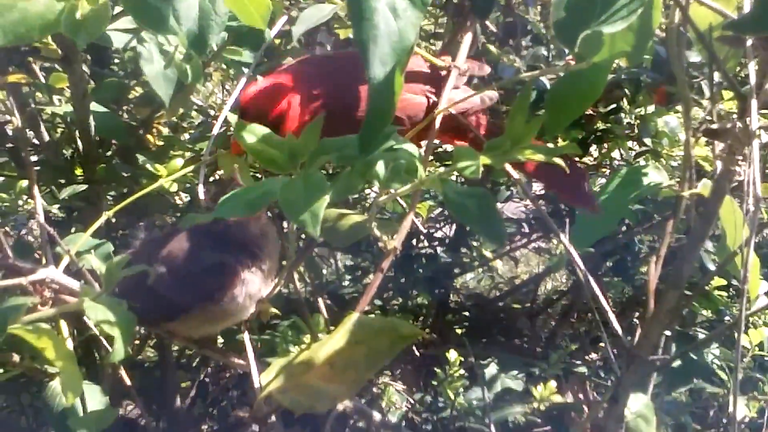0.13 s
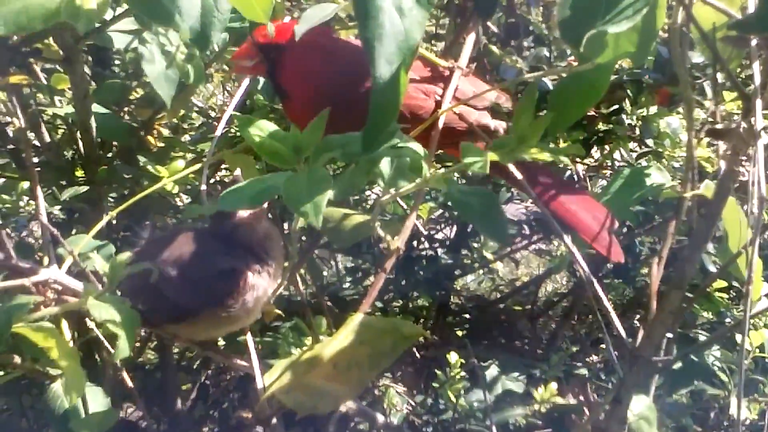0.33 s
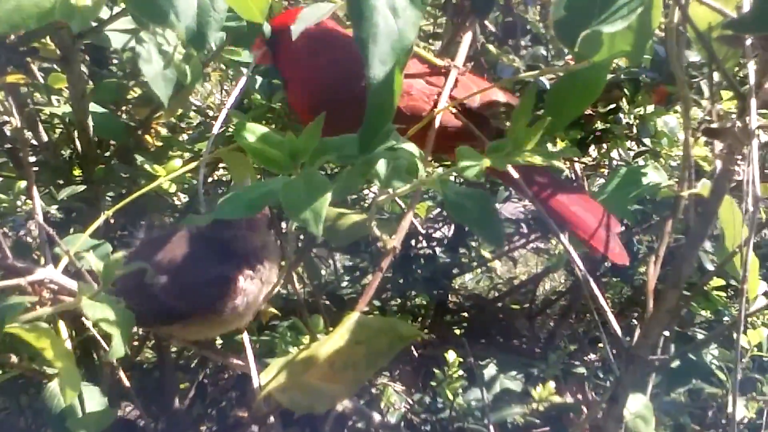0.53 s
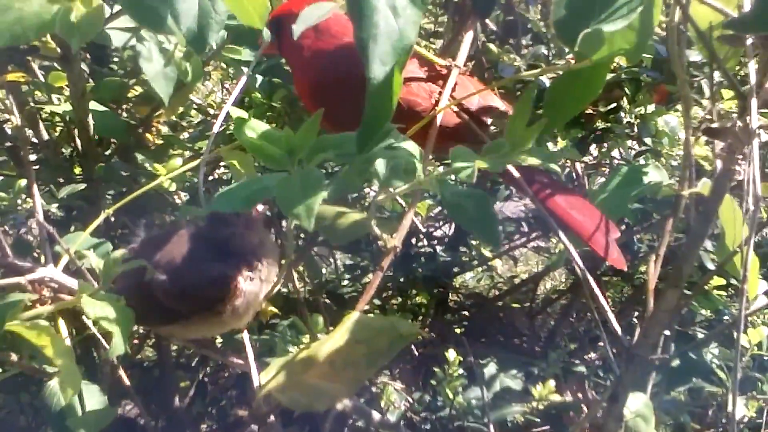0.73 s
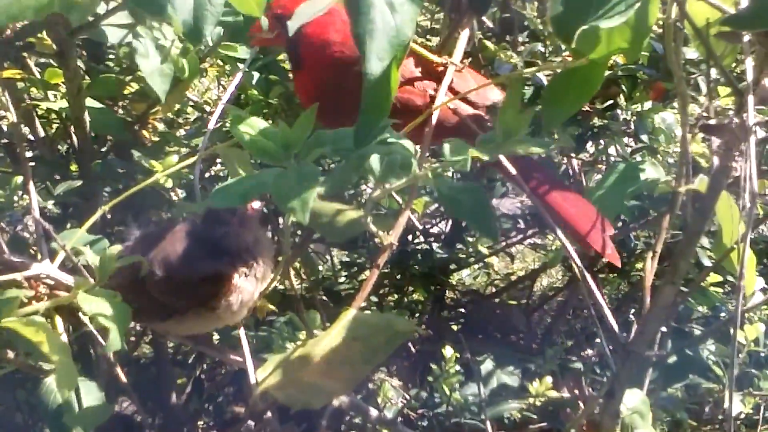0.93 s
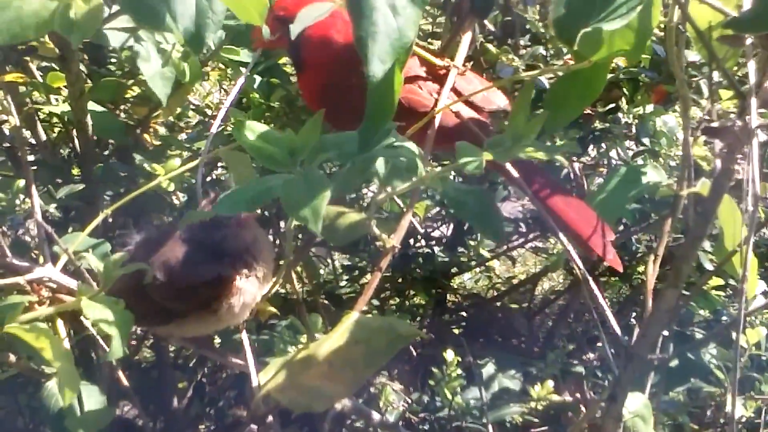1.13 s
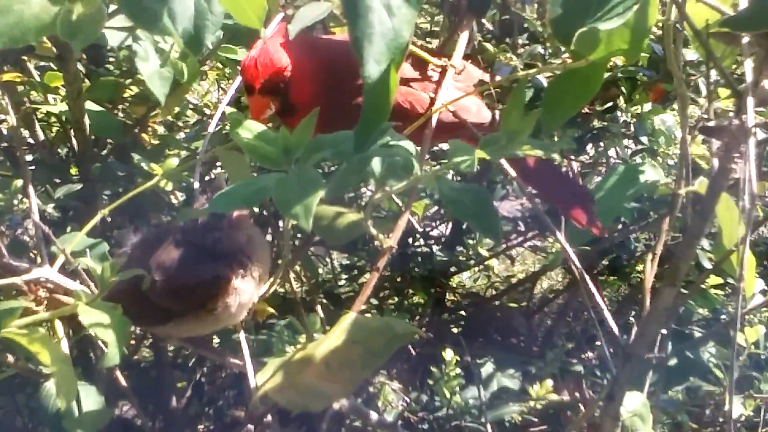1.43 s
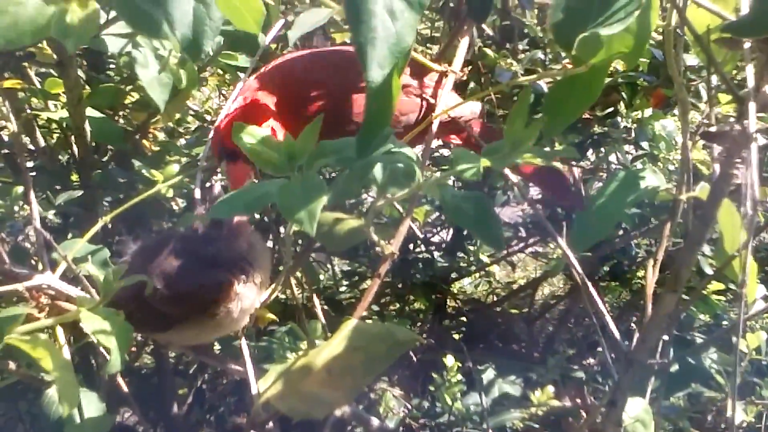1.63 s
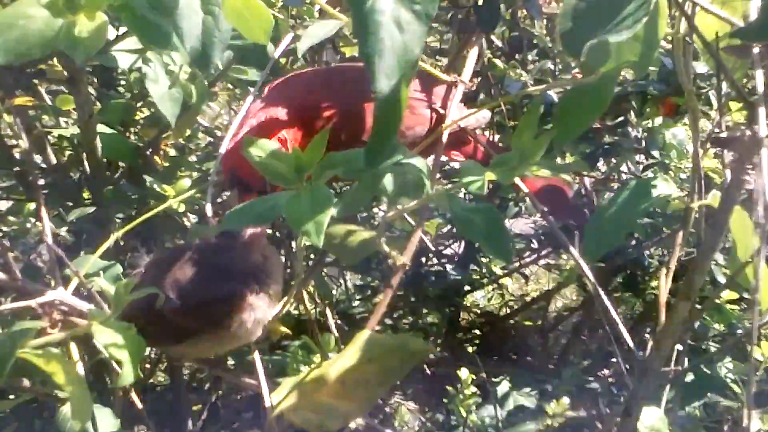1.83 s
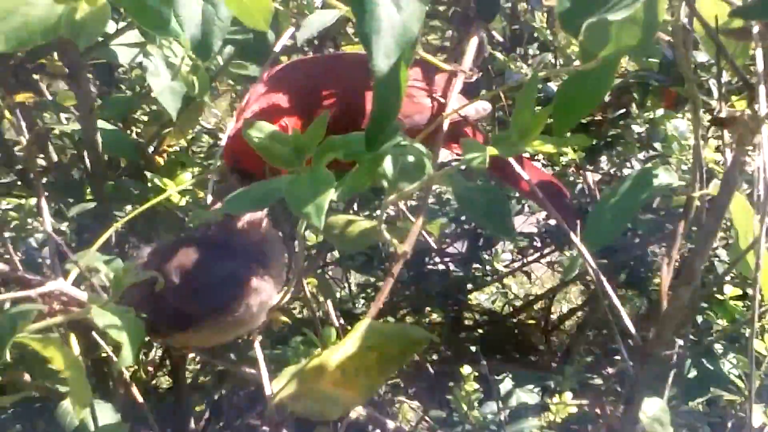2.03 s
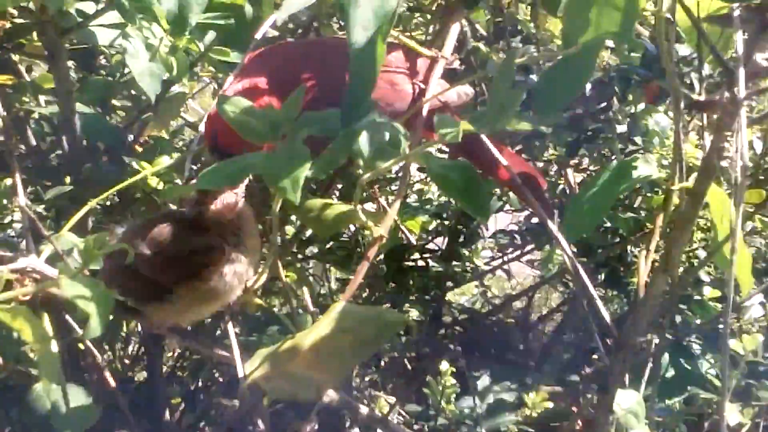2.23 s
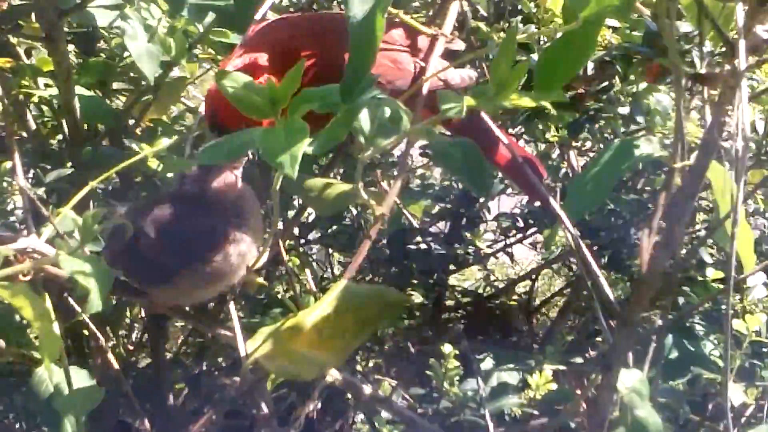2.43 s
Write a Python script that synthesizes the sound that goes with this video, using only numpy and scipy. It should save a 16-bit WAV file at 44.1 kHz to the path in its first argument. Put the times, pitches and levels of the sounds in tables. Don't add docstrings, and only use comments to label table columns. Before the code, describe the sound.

A fledgling's thin, piercing begging whistles, hoarse and buzzy, dominate: a chirp tail at 0 s, a strong call at 0.12-0.36, then softer quick pairs near 0.5, 0.9, 1.26 and 1.56, and a louder pair at 1.9-2.1. Sharp twig snaps hit at 1.97 and 2.04, leaves scuff onward, and the loudest call comes at 2.3-2.4. Faint low hoots, far chirps, slight outdoor echo and soft traffic hum lie behind.

```python
import sys
import numpy as np
from scipy import signal
from scipy.fft import rfft, irfft, next_fast_len
from scipy.io import wavfile
from scipy.ndimage import uniform_filter1d, map_coordinates

SR = 44100
rng = np.random.default_rng(int(sys.argv[2]) if len(sys.argv) > 2 else 0)


def nominal_scale(level):
    x = np.asarray(level, float) / 20
    return 10 ** x


def transcribe(signal):
    frames = np.atleast_2d(signal).T
    limited = np.clip(frames, -1, 1)
    pcm = np.round(limited * 32767).astype(np.int16)
    wavfile.write(sys.argv[1], SR, pcm)


N = 114660


def unit(x):
    return x / np.sqrt(np.mean(x ** 2) + 1e-20)


def wobble(rate):
    return map_coordinates(rng.standard_normal(N // 40), [np.arange(N) * rate / SR])


def filtered(x, response):
    m = next_fast_len(N + 8192)
    return irfft(rfft(x, m) * response(np.fft.rfftfreq(m, 1 / SR)), m)[:N]


def rush(points, patchy_db):
    z = signal.stft(rng.standard_normal(N), nperseg=512)[2]
    field = rng.standard_normal(z.shape)
    field = uniform_filter1d(uniform_filter1d(field, 6, 0), 8, 1)
    x = signal.istft(z * nominal_scale(patchy_db * unit(field)), nperseg=512)[1][:N]
    f, v = np.transpose(points)
    return unit(filtered(x, lambda hz: nominal_scale(np.interp(np.log(hz + 1), np.log(f), v, -90, -90))))


def smooth(curve):
    return uniform_filter1d(curve, size=130)


def turning(hz):
    return 2 * np.pi * np.cumsum(hz) / SR


def tone(phase, level_db):
    flutter = 1 + nominal_scale(-13) * wobble(230)
    return np.sqrt(2) * nominal_scale(level_db) * flutter * np.sin(phase)


def fledgling():
    # t/s, f/Hz, level/dB
    lone_notes = [
        [(0.0, 7500, -26), (0.012, 7000, -23.5), (0.028, 7600, -61), (0.035, 7450, -49.5)],
        [(0.12, 7150, -45), (0.13, 7500, -39.5), (0.146, 6862, -26), (0.168, 6886, -20), (0.264, 7153, -20),
         (0.306, 7204, -26), (0.318, 6930, -36.5), (0.338, 7020, -36.5), (0.36, 7310, -53)],
        [(2.228, 6860, -58), (2.238, 6970, -36), (2.262, 6464, -32.5), (2.29, 6710, -24.5), (2.3, 6990, -25),
         (2.312, 7183, -30.5)],
        [(2.314, 6940, -21.5), (2.322, 6930, -16), (2.364, 7080, -14), (2.376, 7130, -22.5), (2.382, 7010, -19),
         (2.4, 7240, -30.5), (2.408, 6900, -24.5), (2.416, 6900, -45.5)],
    ]
    first_notes = [
        [(0.498, 7830, -69), (0.508, 7671, -37), (0.518, 7446, -33.5), (0.534, 7226, -40), (0.538, 7040, -36),
         (0.56, 7037, -30.5), (0.622, 7203, -30), (0.638, 6940, -40.5), (0.65, 7069, -42)],
        [(0.903, 7949, -55), (0.909, 7815, -42.5), (0.915, 7514, -36), (0.959, 7090, -29), (0.977, 7240, -33.5),
         (0.989, 7030, -27), (1.003, 7345, -30), (1.033, 7003, -28.5), (1.05, 6830, -53)],
        [(1.259, 7720, -55), (1.271, 7510, -35.5), (1.287, 7400, -34.5), (1.297, 7253, -36),
         (1.307, 7140, -27.5), (1.359, 7190, -28), (1.384, 7000, -41.5)],
        [(1.561, 7880, -61), (1.573, 7670, -34), (1.591, 7250, -34), (1.617, 7460, -33), (1.627, 7225, -27),
         (1.649, 7250, -31.5), (1.661, 7340, -27), (1.687, 7120, -37.5), (1.696, 7097, -56)],
        [(1.887, 7330, -57), (1.895, 7600, -37.5), (1.911, 7330, -29), (1.933, 7300, -26.5), (1.941, 7247, -21),
         (1.969, 7293, -20), (2.003, 7430, -24), (2.023, 6975, -26.5), (2.027, 7430, -27)],
    ]
    second_notes = [
        [(0.654, 6550, -38), (0.662, 7110, -39), (0.686, 7410, -28.5), (0.726, 7190, -32.5), (0.732, 7000, -40),
         (0.74, 6600, -49)],
        [(1.064, 7229, -49), (1.072, 7060, -35), (1.094, 7530, -29.5), (1.102, 7240, -28), (1.108, 7350, -31),
         (1.112, 7250, -30), (1.124, 7310, -29), (1.146, 6720, -46.5)],
        [(1.392, 7000, -39), (1.398, 7270, -39.5), (1.426, 7445, -27), (1.446, 7380, -29.5),
         (1.462, 7150, -34.5), (1.47, 6980, -45)],
        [(1.7, 7043, -41.5), (1.716, 7410, -36), (1.762, 7420, -32), (1.77, 7229, -32), (1.778, 7170, -39),
         (1.786, 6980, -46)],
        [(2.029, 7320, -24.5), (2.041, 7420, -28), (2.055, 7296, -26), (2.075, 7170, -30.5),
         (2.091, 7490, -27.5), (2.099, 7360, -32.5), (2.107, 6790, -26.5), (2.115, 6630, -38)],
    ]
    # split/Hz, upper side tone joins after/s, upper/dB, third/dB, lower/dB
    splits = [(1177, 0.0056, -6.5, -33, -26.5), (982, 0.028, -15, -27.5, -30.5),
              (1030, 0.036, -1.5, -22.5, -36), (1000, 0, -6.5, -26, -32.5), (976, 0.023, -5.5, -22, -34.5),
              (1020, 0.011, -2.5, -24, -28), (1034, 0.027, -5, -22.5, -33), (1004, 0, -5.5, -24.5, -31),
              (955, 0.026, -1.5, -22, -37), (1080, 0.017, -5, -24, -28), (830, 0.028, -6.5, -24, -19),
              (1096, 0.011, -12, -34, -17), (1100, 0.011, -22.5, -29.5, -58),
              (940, 0.011, -17.5, -29.5, -22.5)]
    # t/s, dip/dB
    catches = [(0.229, -7), (.314, -6), (.576, -13), (0.932, -9), (0.94, -8), (1.086, -8), (1.324, 0.5),
               (1.74, -11), (1.951, -5), (1.978, -0.5), (1.988, -9), (2.006, -20), (2.014, -4), (2.053, -6),
               (2.372, -4)]
    settle_s, catch_s, join_s, edge_s = 0.042, 0.0018, 0.003, 0.004
    split_wander_hz, quiver_hz, quiver_rate = 74, 43, 210
    muted_db = -24

    t = np.arange(N) / SR
    notes = sorted(lone_notes + first_notes + second_notes)
    knot_s, hz, db = np.transpose(sum(map(list, notes), []))
    hz, db = (smooth(np.interp(t, knot_s, c)) for c in (hz, db))
    db = db + sum(dip_db * np.exp(-((t - s) / catch_s) ** 2) for s, dip_db in catches)

    starts, ends = np.transpose([(n[0][0], n[-1][0]) for n in notes])
    which = np.clip(np.searchsorted(starts, t) - 1, 0, None)
    since = np.abs(t - starts[which])
    gate = uniform_filter1d(1. * (t < ends[which]), size=round(edge_s * SR))
    split, joins, upper_db, third_db, lower_db = (c[which] for c in np.transpose(splits))
    early = smooth(1 / (1 + np.exp(np.clip((t - starts[which] - joins) / join_s, -30, 30))))
    upper_db = smooth(upper_db) + muted_db * early
    third_db = smooth(third_db) + muted_db * early

    whistle = turning(hz + quiver_hz * wobble(quiver_rate))
    second = turning(split + split_wander_hz * wobble(quiver_rate))
    wide = turning(1630 + 2 * split_wander_hz * wobble(quiver_rate))
    side = tone(whistle + second, upper_db)
    side += tone(whistle - second, lower_db + 2 * wobble(21.7))
    side += tone(whistle + second + turning(split), third_db) * (1 + 0.12 * wobble(300))
    wide_pair = tone(whistle + wide, -11) + tone(whistle - wide, -23)
    side += early * np.clip(joins / settle_s, 0, 1) * wide_pair

    over = tone(2 * whistle, -39 + 4 * wobble(18))
    over += tone(2 * whistle + second, -30 + upper_db + 4 * wobble(17.9))
    over += tone(2 * whistle - second, -65)
    opening_db = 16.5 * (hz - 7200) / 1000
    over *= nominal_scale(opening_db + early * muted_db / 2) * (1 + nominal_scale(-11) * wobble(900))

    rough_db = -16 - 0.5 * np.clip(db + 16.5, -9, 15)
    jitter = unit(filtered(rng.standard_normal(N), lambda f: 1 / (1 + (f / 170) ** 2)))
    voice = nominal_scale(db) * (tone(whistle, 0) + side + over) * (1 + nominal_scale(rough_db) * jitter)
    settled = smooth(1 - np.exp(-since / settle_s))
    return gate * (voice + breath(db, early, settled, since, joins))


def breath(db, early, settled, since, joins):
    # f/Hz, level/dB
    hoarse = [(3200, -24), (4300, -15), (6000, -7), (9500, 0), (12500, -5), (14000, -18), (15500, -24)]
    hiss = nominal_scale(-42.5 + 0.58 * db + 4.9 * early) * settled * rush(hoarse, patchy_db=3)
    plume_s, from_hz, to_hz = 0.05, 6000, 4300
    age = since / plume_s
    sinking = turning(to_hz + (from_hz - to_hz) * np.exp(-age))
    swell = smooth(age * np.exp(1 - age) * joins / plume_s)
    return hiss + nominal_scale(-61) * swell * wobble(2000) * np.sin(sinking)


def twigs():
    # t/s, peak/dB, body f/Hz, ring/dB, crack/dB
    snaps = [
        (0.3408, -44, 11600, -52, -33),
        (1.9668, -5.5, 4730, -19.5, 0),
        (2.036, -10, 6340, -25, -10),
        (2.362, -31.5, 3000, -45, -35),
        (2.447, -30, 6800, -50, -9),
    ]
    # t/s, peak/dB, body f/Hz, ring/dB, crack/dB
    tick = (2.2255, -33, 6350, -40, -14)
    twig_hz, twig_t60, crack_s, body_s = 4200, 0.047, 0.000097, 0.000616
    low_hz, dull_hz = 1400, 11000
    out, t = np.zeros(N + SR), np.arange(SR // 20) / SR

    def bump(rise):
        return t / rise * np.exp(1 - t / rise)

    for s, db, hz, ring_db, crack_db in snaps + [tick]:
        crack = nominal_scale(crack_db) * np.diff(rng.standard_normal(len(t) + 1)) * bump(crack_s) ** 2
        sinking = 0.748 * t + 0.955 * body_s * (1 - np.exp(-t / body_s))
        body = bump(body_s) ** 2 * np.sin(2 * np.pi * hz * sinking)
        lower = 0.17 * np.sin(2 * np.pi * 0.479 * hz * t) + 0.31 * np.sin(2 * np.pi * 0.617 * hz * t)
        body += bump(body_s) ** 3 * lower
        ring = nominal_scale(ring_db - 60 * t / twig_t60) * np.sin(2 * np.pi * twig_hz * t)
        ring *= 1 - np.exp(-t / body_s)
        out[round(s * SR):][:len(t)] += nominal_scale(db) * (crack + body + ring)
    return filtered(out[:N], lambda f: 1 / (1 + (low_hz / (f + 1)) ** 8) / (1 + (f / dull_hz) ** 4))


def scuff():
    # t/s, level/dB
    hiss_curve = [
        (1.875, -81),
        (1.901, -61.5),
        (2.09, -56.5),
        (2.14, -49),
        (2.27, -54.5),
        (2.31, -53),
        (2.532, -62.5),
        (2.6, -62),
    ]
    # t/s, spread/s, level/dB
    brushes = [
        (2.278, 0.022, -42),
        (2.347, 0.0068, -42.5),
        (2.367, 0.014, -36.5),
        (2.409, 0.014, -47),
        (2.457, 0.026, -43.5),
        (2.6, 0.014, -47),
    ]
    # f/Hz, level/dB per Hz
    leaves = [(590, -51), (1000, -11), (2130, -1), (4920, -3), (5850, 2), (15500, -33.5)]
    # f/Hz, level/dB per Hz
    brush = [(120, -40), (200, -14), (1200, -22), (3070, -20), (4780, -24), (6000, -14.5), (7800, -46),
             (13200, -120)]
    s, db = np.transpose(hiss_curve)
    t = np.arange(N) / SR
    grain = nominal_scale(2.3 * wobble(45) + 0.6 * wobble(940))
    hiss = nominal_scale(np.interp(t, s, db, left=-120) + 9.5) * unit(grain * rush(leaves, patchy_db=2.0))
    strokes = sum(nominal_scale(db) * np.exp(-((t - s) / spread) ** 2 / 2) for s, spread, db in brushes)
    return hiss + strokes * nominal_scale(1.96 * wobble(150)) * rush(brush, patchy_db=3)


def garden(x):
    t = np.arange(SR) / SR

    def tail(db, t60):
        return nominal_scale(db) * unit(rng.standard_normal(SR) * nominal_scale(-60 * t / t60)) / np.sqrt(SR)

    echo = tail(-15, t60=0.075) + tail(-30, t60=0.7)
    return signal.fftconvolve(x, np.pad(echo, (40, 0)))[:N]


def far_tones(rows, blur, depth, second_db):
    out, fade = np.zeros(N + SR), 1 + depth * wobble(blur)
    for s, length, start_hz, end_hz, db in rows:
        u = np.linspace(0, 1, int(length * SR))
        phase = turning(start_hz + (end_hz - start_hz) * u)
        swell = np.abs(np.sin(np.pi * u)) ** 0.41
        note = np.sin(phase) + nominal_scale(second_db) * np.sin(2 * phase)
        out[int(s * SR):][:len(u)] += nominal_scale(db) * swell * note
    return out[:N] * fade


def hoots():
    # t/s, length/s, start f/Hz, end f/Hz, level/dB
    hoot_rows = [(0, 0.084, 280, 359, -45), (.1, 0.091, 368.5, 396, -52), (.21, 0.072, 321, 263, -48.5),
                 (.61, 0.13, 292.2, 331, -50), (.66, 0.14, 374, 397, -50.5), (.94, 0.27, 314.8, 340, -47.5),
                 (1.33, 0.11, 384, 358, -50.5), (2.02, 0.15, 420, 461, -53.5), (1.17, 0.083, 346, 352, -55),
                 (1.4, .08, 350, 339, -58), (2.34, 0.099, 208.6, 271, -47.5),
                 (2.55, 0.16, 294.5, 310, -43.5)]
    return far_tones(hoot_rows, blur=35, depth=0.44, second_db=-13)


def chirps():
    # t/s, length/s, start f/Hz, end f/Hz, level/dB
    chirp_rows = [(0, 0.24, 3290, 3180, -71), (0, 0.119, 2940, 3050, -67), (.1, 0.096, 2720, 2720, -67),
                  (.98, 0.048, 2930, 2940, -66), (1.565, 0.11, 5310, 5290, -66),
                  (1.75, .16, 4000, 4230, -73), (1.835, 0.025, 4200, 4200, -64),
                  (1.77, .08, 2950, 3150, -71), (1.69, .16, 1330, 1330, -66)]
    return far_tones(chirp_rows, blur=500, depth=0.97, second_db=-41)


def air():
    # f/Hz, level/dB per Hz
    hum = [(18, -79), (30, -10), (335, -3), (795, -18.5), (1310, -14.5), (3360, -28), (4150, -32),
           (4610, -31), (15800, -29.5)]
    # f/Hz, width/Hz, level/dB
    street = [(420, 13, -7), (622, 143, 2.5), (903, 111, 4.5), (1333, 38, -6)]

    def lumps(f):
        return 0.47 + sum(nominal_scale(db) / (1 + ((f - hz) / width * 2) ** 2) for hz, width, db in street)

    return nominal_scale(-53 + wobble(2.27)) * unit(filtered(rush(hum, patchy_db=0.5), lumps))


def scene():
    bird, snaps = fledgling(), twigs()
    echo = garden(bird + snaps / 2)
    return (bird + snaps + echo + scuff() + hoots() + chirps() + air())[None]


def top_cut(x):
    return signal.sosfilt(signal.butter(12, 16880, fs=SR, output="sos"), x)


def record(dry):
    low_hz, top_hz = 45, 15830
    heard = filtered(dry[0], lambda f: (f < top_hz) / (1 + (low_hz / (f + 1)) ** 4))
    return top_cut(heard[None])


dry = scene()
out = record(dry)
transcribe(out)
```